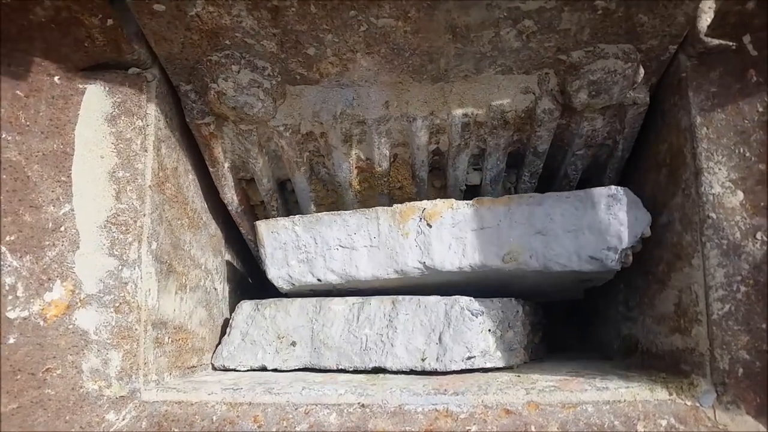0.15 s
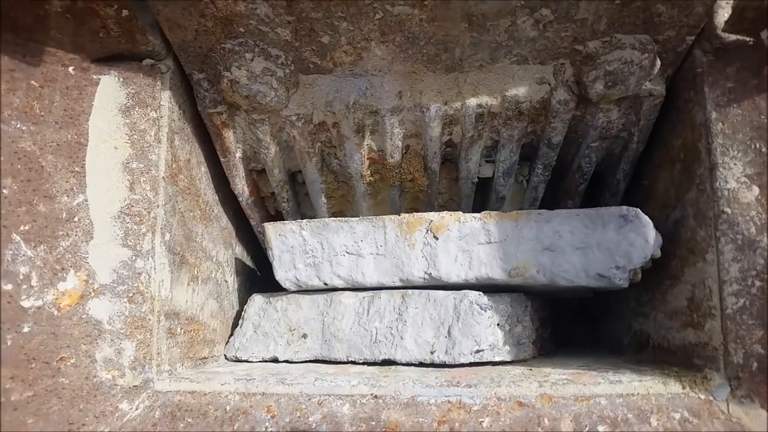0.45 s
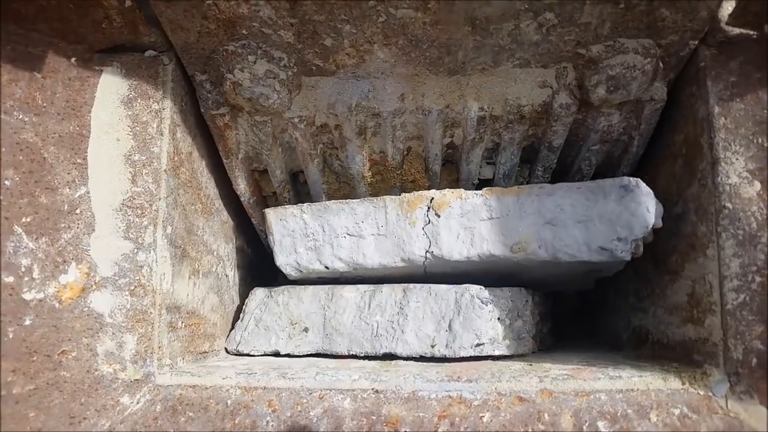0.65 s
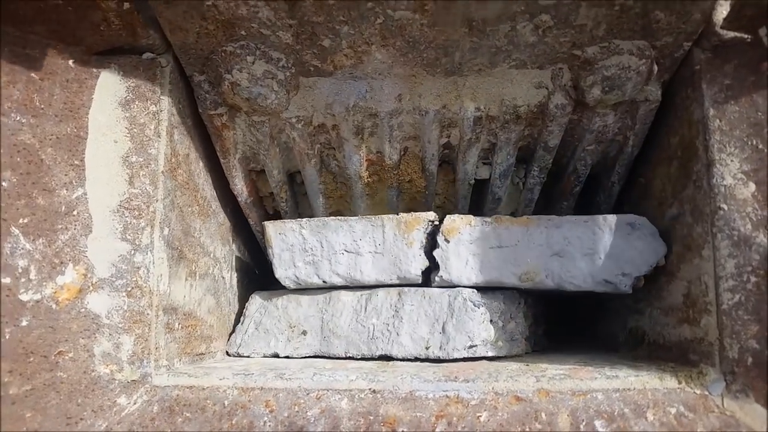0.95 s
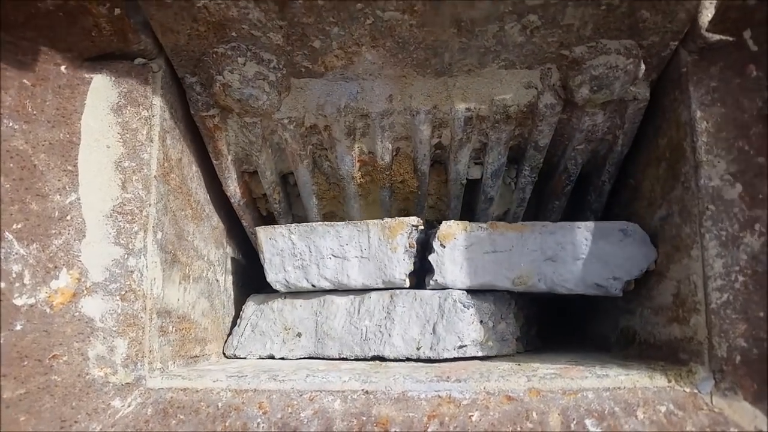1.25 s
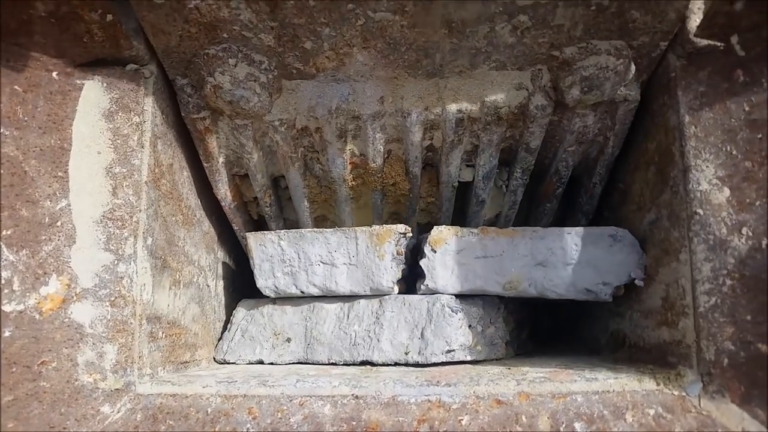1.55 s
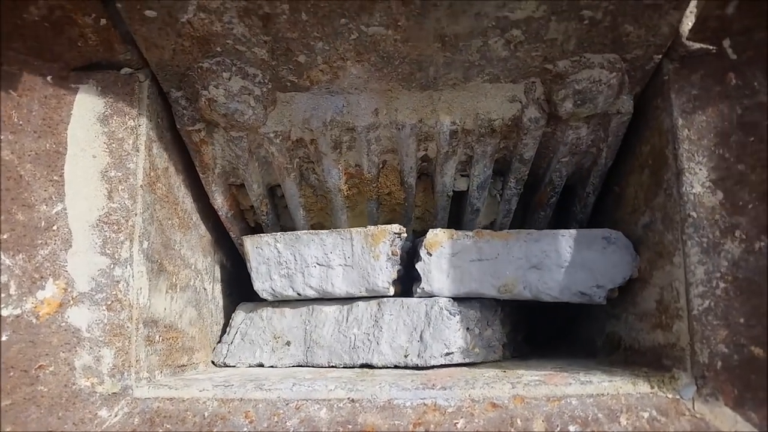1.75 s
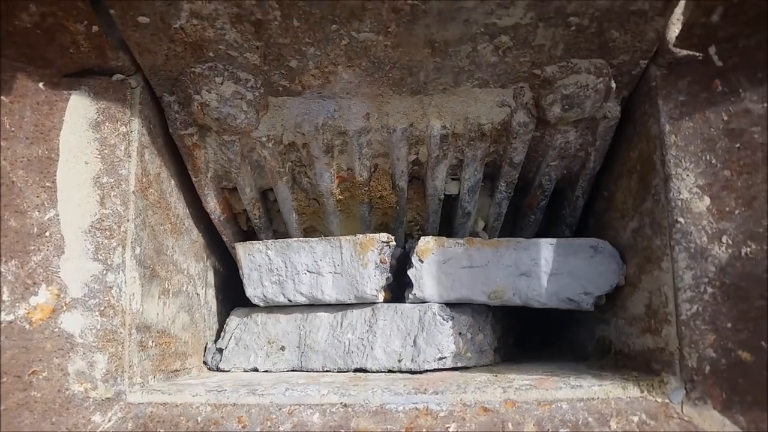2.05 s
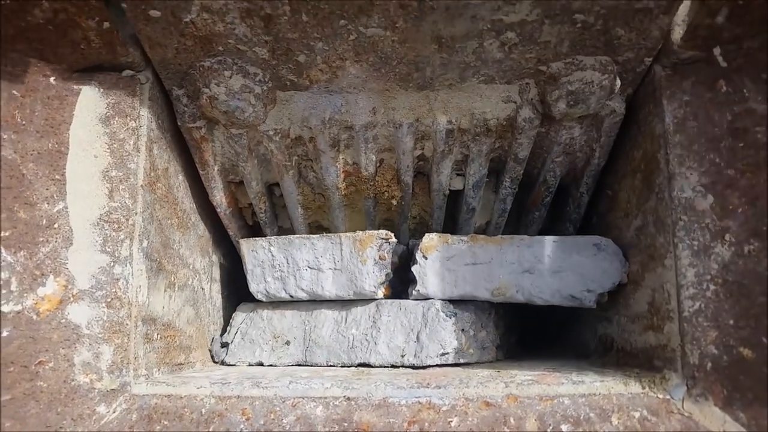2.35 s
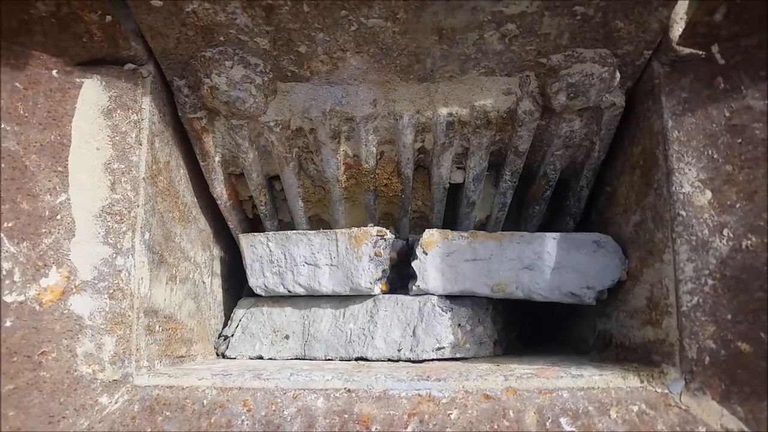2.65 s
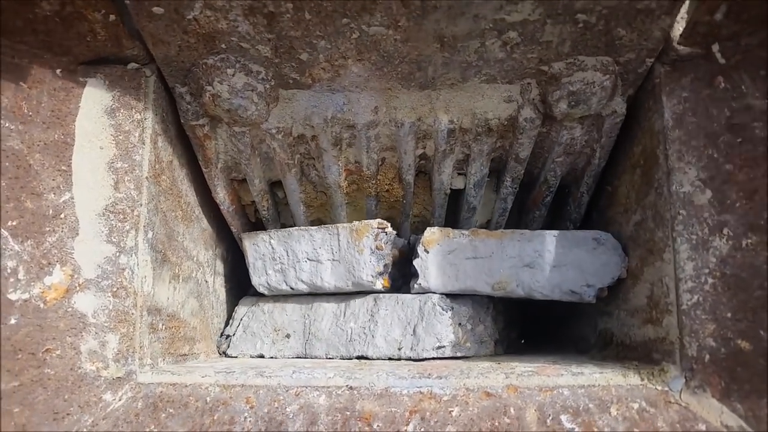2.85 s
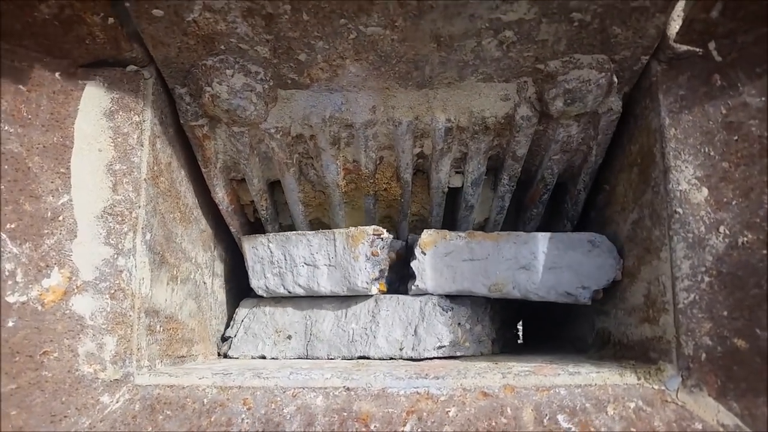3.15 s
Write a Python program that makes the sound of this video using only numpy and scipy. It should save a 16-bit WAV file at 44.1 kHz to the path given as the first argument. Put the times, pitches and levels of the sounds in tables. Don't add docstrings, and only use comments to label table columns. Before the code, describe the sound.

A jaw crusher runs on a steady, slow-cylinder diesel chug, about eight thumping cycles a second, while concrete grinds, cracks sharply and rattles on steel; outdoors, close stereo microphone above the hopper.

```python
import sys
import numpy as np
from scipy import signal
from scipy.fft import rfft, irfft, next_fast_len
from scipy.io import wavfile

SR = 44100
rng = np.random.default_rng(int(sys.argv[2]) if len(sys.argv) > 2 else 0)


def wav_record(signal):
    frames = np.transpose(np.atleast_2d(signal))
    bounded = np.clip(frames, -1, 1)
    quanta = np.round(bounded * 32767).astype(np.int16)
    wavfile.write(sys.argv[1], SR, quanta)


def ratio_of_db(decibels):
    return 10 ** (np.asarray(decibels, float) / 20)


N = 145971

# f/Hz, level/dB per Hz
HISS = [(530, -38), (900, 7), (2690, 0.5), (3230, 7.5), (7960, -2), (14700, 5), (16000, -5)]


def unit(x):
    return x / np.sqrt(np.mean(x ** 2) + 1e-20)


def along(points, hz):
    f, v = np.transpose(points)
    return np.interp(np.log(hz + 1), np.log(f + 1), v)


def filtered(x, response):
    m = next_fast_len(N + 8192)
    return irfft(rfft(x, m) * response(np.fft.rfftfreq(m, 1 / SR)), m)[..., :N]


def rush(spectrum):
    # f/Hz, likeness/1
    likeness = [(300, .98), (600, .6), (1200, .2), (5000, .15)]

    def response(hz):
        turn = np.arccos(np.clip(along(likeness, hz), -1, 1)) / 2
        return ratio_of_db(along(spectrum, hz)) * [np.cos(turn), np.sin(turn)]

    mid, side = filtered(rng.standard_normal((2, N)), response)
    return unit(np.array([mid + side, mid - side]))


def swell(t, rise, t60):
    return (1 - np.exp(-t / rise)) * ratio_of_db(-60 * t / t60)


def add(out, start_s, shape):
    first = int(start_s * SR)
    t = np.arange(max(0, first + 1), min(N, first + SR // 7))
    out[t] += shape(t / SR - start_s)


def cycle_starts():
    cycle_s, first_s, jitter_s = .1257017, -.00655, .00012
    starts = first_s + cycle_s * np.arange(-1, 27)
    return starts + jitter_s * rng.standard_normal(len(starts))


def nearness():
    # t/s, level/dB
    loudness = [(0, 2.5), (1, 1.5), (1.5, 0), (2.5, -0.5), (3.31, -2)]
    return ratio_of_db(np.interp(np.arange(N) / SR, *np.transpose(loudness)))


def engine_rings(starts):
    # t/ms into the cycle, f/Hz, level/dB, rise/ms, t60/ms
    exhaust = [
        (.9, 92.5, -11.5, 8, 147),
        (2.1, 149, -15.5, 3.3, 103),
        (3.3, 1576, -18, 2.2, 30),
        (-14, 53, -16.5, 20, 150),
    ]
    knock = [(33.6, 375, -10, 8, 61), (34.1, 2095, -24, 8, 28), (34.4, 922, -22, .6, 31),
             (34.8, 220, -6, 4.2, 57), (34.6, 1570, -11, 2.5, 40)]
    thump = [(38.5, 633, -1, 8, 9.4), (41.8, 665, -14.5, .3, 46), (44.4, 204, 12, 7.3, 13.9),
             (45.4, 306, -15, 2.1, 110)]
    valve_a = [(67.3, 345, -15.5, 8, 61), (70, 245, -12.5, 8, 160), (73.9, 1617, -15.5, 6, 60),
               (72.5, 706, -18.5, 3, 200)]
    valve_b = [(99, 1065, -19.5, 8, 42), (101.5, 1560, -19, 1, 40), (106.1, 342, -16, .2, 58),
               (103, 690, -28, 3, 120)]
    force_scatter_db, detune = 1, .004
    part_scatter_db, part_detune, part_jitter_ms = 1, .006, .08
    events = [(exhaust, np.inf), (knock + thump, np.inf), (valve_a, 98), (valve_b, np.inf)]
    damping_ms = 3
    out = np.zeros(N)
    for start in starts:
        for parts, end_ms in events:
            force_db, tune = rng.standard_normal(2) * [force_scatter_db, detune]
            for ms, hz, db, rise_ms, t60_ms in parts:
                scatter = [part_scatter_db, part_detune, part_jitter_ms]
                own_db, own_tune, late_ms = rng.standard_normal(3) * scatter
                pitch = hz * (1 + tune + own_tune)

                def ring(t):
                    held = np.exp(-np.maximum(1000 * t + ms - end_ms, 0) / damping_ms)
                    tone = np.sin(2 * np.pi * pitch * t)
                    return ratio_of_db(db + force_db + own_db) * held * swell(1000 * t, rise_ms, t60_ms) * tone

                add(out, start + (ms + late_ms) / 1000, ring)
    return out


def exhaust_jet(starts):
    peak_ms, width_ms, jet_db, scatter_db = 10.4, 4.5, -23.5, 2
    gate = np.zeros(N)
    for start in starts:
        size = ratio_of_db(jet_db + scatter_db * rng.standard_normal())
        add(gate, start, lambda t: size * np.exp(-((1000 * t - peak_ms) / width_ms) ** 2))
    return gate * rush(HISS)


def engine_noise(starts, rows, spectrum):
    scatter_db = 1.5
    gate = np.zeros(N)
    for start in starts:
        for ms, db, rise_ms, t60_ms in rows:
            size = ratio_of_db(db + scatter_db * rng.standard_normal())

            def puff(t):
                soft = 1 - np.exp(-1000 * t / rise_ms)
                return size * soft * swell(1000 * t, rise_ms, t60_ms)

            add(gate, start + ms / 1000, puff)
    return gate * rush(spectrum)


def gas_puffs(starts):
    puffs = [
        (17.3, -22.5, 9.7, 121),
        (34.8, -38, 2.9, 29),
        (69, -32, 0.64, 34),
        (100, -71, 1.8, 23),
    ]
    return engine_noise(starts, puffs, HISS)


def clatter(starts):
    rattles = [
        (5.13, -24, 6.5, 100),
        (33, -31, 0.71, 87),
        (75, -25, 1.8, 36),
        (101.5, -27.5, 2.2, 150),
    ]
    # f/Hz, level/dB per Hz
    colour = [(300, -75), (600, 5), (1500, -2.5), (4000, -2.5), (6000, -40), (16000, -14.5)]
    return engine_noise(starts, rattles, colour)


def cracks():
    # t/s, snap peak/dB, plate ring/dB, lump pitch f/Hz
    breaks = [(0.154, -16.5, -31, 366), (0.3467, -41, -20, 332), (0.3671, -32, -9, 546),
              (0.399, -22, -15, 720), (0.408, -13, -10, 600), (0.474, -46, -16, 574),
              (0.4457, -10, -18, 396), (0.4644, -21, -16.5, 714), (0.6811, -12, -11.5, 625),
              (0.6994, -17, -19, 366), (0.7197, -34, -14, 365), (0.728, -38, -36, 385),
              (0.98, -22, -26, 650), (1.005, -25, -23, 333), (0.9444, -18, -21, 673),
              (1.1015, -24.5, -17.5, 328), (1.1975, -26, -16.5, 696), (1.2438, -24, -13.5, 326),
              (1.294, -19, -20.5, 366), (1.325, -30, -24.5, 670), (1.8304, -20.5, -18, 380),
              (2.0398, -25, -24, 333), (2.0601, -11.5, -16.5, 333), (2.081, -36, -26, 320),
              (2.1033, -14, -17.5, 350), (2.335, -32, -18, 566), (2.361, -28, -20.5, 625),
              (2.418, -33, -30, 400), (2.177, -18.5, -29, 338), (2.238, -23.5, -18, 350),
              (2.2822, -12.5, -11, 580), (2.3171, -11.5, -12.5, 540), (2.4041, -13.5, -15.5, 372),
              (2.624, -32, -15.5, 660), (2.6543, -12, -16, 630), (2.8724, -38, -37, 406),
              (2.884, -21.5, -16.5, 578), (2.899, -34, -19.5, 627), (2.9501, -19, -27, 366),
              (3.1963, -19.5, -15, 396), (3.2263, -17, -23, 624), (3.267, -20, -39, 347)]
    # f/Hz, level/dB, t60/s
    plates = [(366, 5.5, 0.094), (523.7, -2.5, 0.1), (555, -15, 0.083), (627, 0.5, 0.085),
              (658, -17.5, 0.04), (976.3, -3.5, 0.15), (1045, -0.5, 0.038), (1642, -12.5, 0.21),
              (2399, -4.5, 0.036), (3040, -27, 0.036), (3445, -15, 0.18)]
    # f/Hz, level/dB per Hz
    snap_colour = [(500, -26), (1500, 3), (4000, 0), (8000, -12), (13000, -2.5), (16000, -5.5)]
    snap_gain_db, snap_t60_s, click, click_t60_s = -5.5, .085, 1.1, .015
    plate_gain_db, plate_scatter_db, plate_detune = -7, 3.5, .0125
    lump_gain_db, lump_t60_s = -1.5, .088
    gate, ring = np.zeros(N), np.zeros(N)
    hz, level_db, t60 = np.transpose(plates)[:, :, None]
    for s, snap_db, ring_db, lump_hz in breaks:
        scatter_db = plate_scatter_db * rng.standard_normal(hz.shape)
        size = ratio_of_db(ring_db + plate_gain_db + level_db + scatter_db)
        pitch = hz * (1 + plate_detune * rng.standard_normal(hz.shape))

        def snap(t):
            both = swell(t, .001, snap_t60_s) + click * swell(t, .0003, click_t60_s)
            return ratio_of_db(snap_db + snap_gain_db) * both

        def plate(t):
            return (size * swell(t, .00069, t60) * np.sin(2 * np.pi * pitch * t)).sum(0)

        def lump(t):
            tone = np.sin(2 * np.pi * lump_hz * t)
            return ratio_of_db(ring_db + lump_gain_db) * swell(t, .0008, lump_t60_s) * tone

        add(gate, s, snap)
        add(ring, s, plate)
        add(ring, s, lump)
    return gate * rush(snap_colour), ring


def pings():
    # t/s, f/Hz, level/dB, t60/s
    shards = [(.374, 4100, -22, .05), (.359, 2450, -24, .04), (.4445, 3510, -21, .04),
              (.462, 3600, -18, .07), (.680, 4600, -18, .05), (.684, 3555, -25, .13),
              (.697, 2200, -19, .03), (.704, 3555, -23, .12), (1.198, 3630, -21, .13),
              (1.2446, 2430, -15, .03), (2.061, 2700, -18, .1), (2.066, 10500, -27, .03),
              (2.283, 2720, -19, .08), (2.284, 3700, -23, .1), (2.318, 3620, -20, .08),
              (2.402, 3090, -21, .08), (1.293, 370, -9, .16), (2.414, 400, -12, .1), (.368, 540, -15, .07),
              (2.319, 560, -15, .08), (2.654, 2410, -21, .05), (2.675, 1640, -23, .2),
              (2.873, 2710, -21, .03), (2.95, 4500, -22, .05), (3.227, 1920, -19, .04),
              (3.268, 3320, -22, .05)]
    waver = .01
    out = np.zeros(N)
    for s, hz, db, t60 in shards:
        drift = np.cumsum(rng.standard_normal(SR // 6)) * np.sqrt(2 * np.pi * waver * hz / SR)

        def note(t):
            return ratio_of_db(db) * swell(t, t60 / 50, t60) * np.sin(2 * np.pi * hz * t + drift[:len(t)])

        add(out, s, note)
    return out


def grinding():
    # t/s of greatest pressure, level/dB, build-up/s, release/s
    strokes = [(.14, -24, 0.059, 0.12), (.37, -21.5, 0.04, 0.059), (.46, -25, 0.028, 0.11),
               (0.709, -23.5, 0.07, 0.067), (.98, -19.5, 0.1, 0.064), (1.261, -17.5, 0.076, 0.07),
               (1.522, -25.5, 0.05, 0.099), (1.8, -23, 0.066, 0.11), (2.112, -22.5, 0.021, .07),
               (2.301, -26.5, 0.049, 0.17), (2.41, -29, 0.042, 0.016), (2.66, -22, 0.06, 0.048),
               (2.899, -24.5, 0.029, 0.048), (3.23, -28, 0.095, 0.25)]
    # f/Hz, level/dB per Hz
    colour = [(210, -9), (350, 2), (445, -14), (696, -6.5), (1380, -16), (2390, -23.5), (7920, -32),
              (12600, -27), (16000, -26)]
    grains_per_s, grain_t60_s, spread_db = 350, .016, 2.5
    bed, chip_db = .45, -8
    t = np.arange(N) / SR
    pressure = np.zeros(N)
    for s, db, up, down in strokes:
        pressure += ratio_of_db(db) * np.exp(-((t - s) / np.where(t < s, up, down)) ** 2)
    hits = (rng.random(N) < grains_per_s / SR) * ratio_of_db(spread_db * rng.exponential(size=N))
    grains = signal.fftconvolve(hits, ratio_of_db(-60 * t[:SR // 10] / grain_t60_s))[:N]
    crumbling = unit((bed + unit(grains)) * rush(colour))
    return pressure * (crumbling + ratio_of_db(chip_db) * hopper(chips()))


def chips():
    chips_per_s, middle_hz, octaves, spread_db, tilt_db = 350, 3300, .6, 4, -2
    t60_cycles = 32
    count = int(np.ceil(chips_per_s * N / SR))
    when, size = rng.random((2, count))
    octave = octaves * 2 * (rng.random(count) + rng.random(count) - 1)
    k = np.arange(1000)
    waves = (middle_hz * 2 ** octave)[:, None] * k / SR
    level = ratio_of_db(tilt_db * octave - spread_db * np.log(size + .08))
    grain = level[:, None] * np.sin(2 * np.pi * waves) * ratio_of_db(-60 * waves / t60_cycles)
    place = (when * N).astype(int)[:, None] + k
    return unit(np.bincount(place.ravel(), grain.ravel(), minlength=N)[:N])


def hopper(x):
    # f/Hz, level/dB
    walls = [(600, -5), (2000, -1)]
    t = np.arange(SR // 10) / SR
    tail = rng.standard_normal((2, len(t))) * swell(t, .002, .045)
    tail = tail / np.linalg.norm(tail[0])
    echo = signal.fftconvolve(x[None], tail, axes=1)[:, :N]
    return x + filtered(echo, lambda hz: ratio_of_db(along(walls, hz)) * hz ** 4 / (hz ** 4 + 450 ** 4))


def yard():
    # f/Hz, level/dB per Hz
    colour = [(24, -45), (45, -9.5), (226, 3.5), (455, -12), (680, -8.5), (1370, -21.5), (1590, -28),
              (1850, -16.5), (16000, -57)]
    return ratio_of_db(-27) * rush(colour)


def scene():
    starts, near = cycle_starts(), nearness()
    snaps, plate_rings = cracks()
    gas = exhaust_jet(starts) + gas_puffs(starts) + clatter(starts)
    rings = near * engine_rings(starts)
    echo_share = .2
    steel = (1 - echo_share) * rings + hopper(echo_share * rings + plate_rings + pings())
    return steel + near * gas + snaps + grinding() + yard()


def roll_off(x):
    return signal.sosfilt(signal.butter(12, 16600, fs=SR, output="sos"), x)


def record(dry):
    # f/Hz, level/dB
    lean = [(40, -9), (130, -2.5), (290, 0), (640, 2), (1410, -1), (3100, 6), (6820, 9.5), (15000, -0.5)]
    # f/Hz, phase/rad
    lead = [(60, .4), (170, .7), (430, .65), (860, .8), (1300, 1.2), (1720, 2), (2150, 2.7)]
    low_hz, top_hz, cut_hz, above_db, ceiling = 36.4, 15900, 16600, -32, .97
    sign = np.array([[1], [-1]])

    def response(hz):
        bass_cut = (1j * hz / (low_hz + 1j * hz)) ** 2
        treble_cut = np.where(hz < top_hz, 1, ratio_of_db(above_db) * (hz < cut_hz))
        colour = ratio_of_db(sign * along(lean, hz) / 2) * np.exp(.5j * sign * along(lead, hz))
        return bass_cut * treble_cut * colour

    ports = filtered(dry, response)
    ports = ports / (1 + np.abs(ports / ceiling) ** 6) ** (1 / 6)
    return roll_off(ports)


dry = scene()
out = record(dry)
wav_record(out)
```